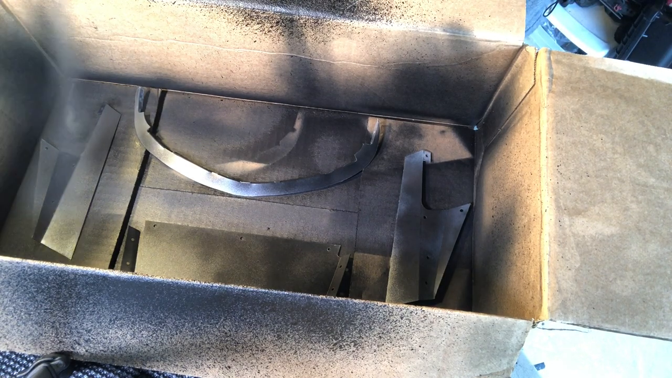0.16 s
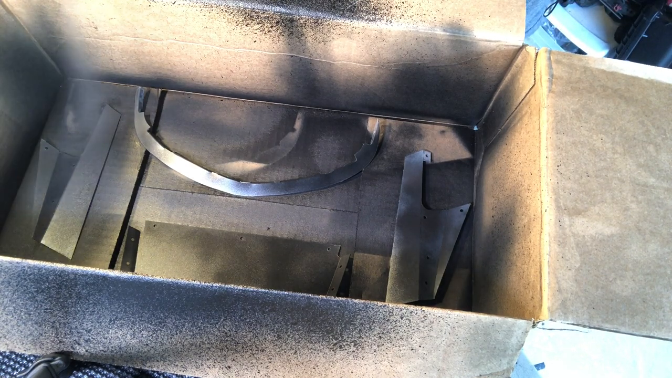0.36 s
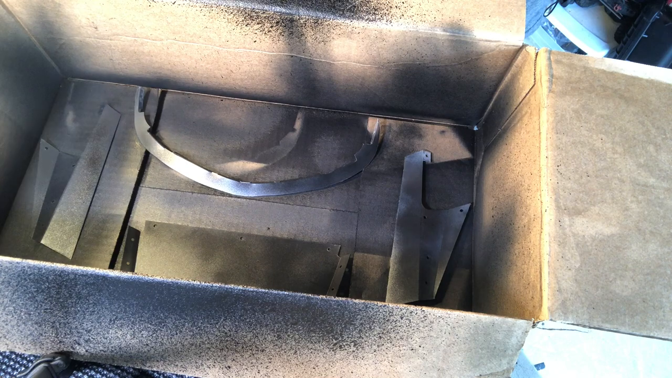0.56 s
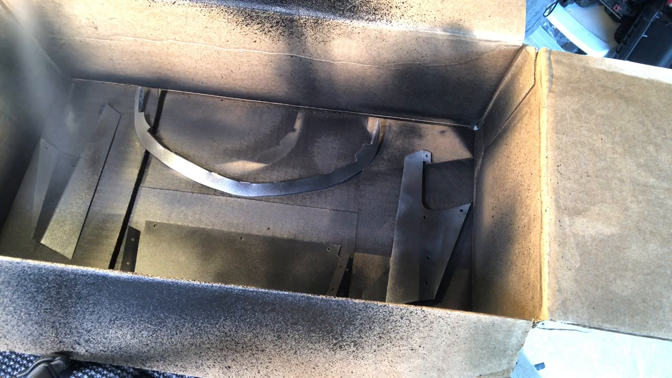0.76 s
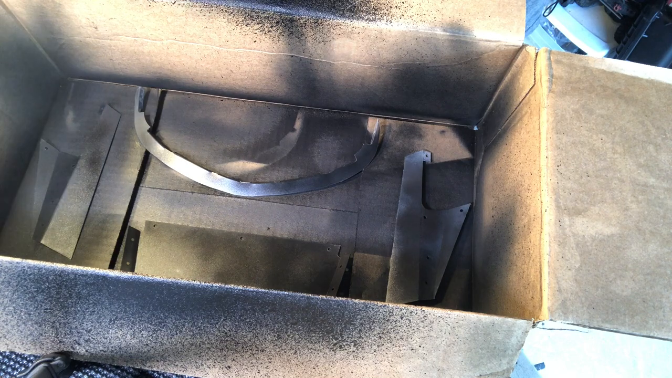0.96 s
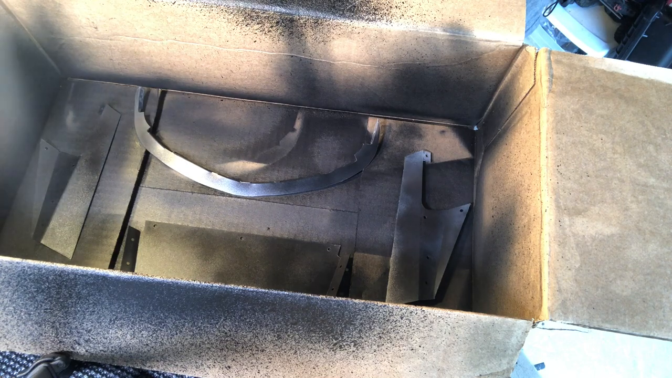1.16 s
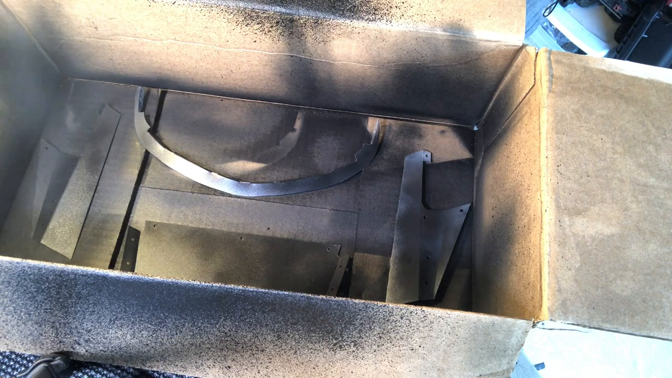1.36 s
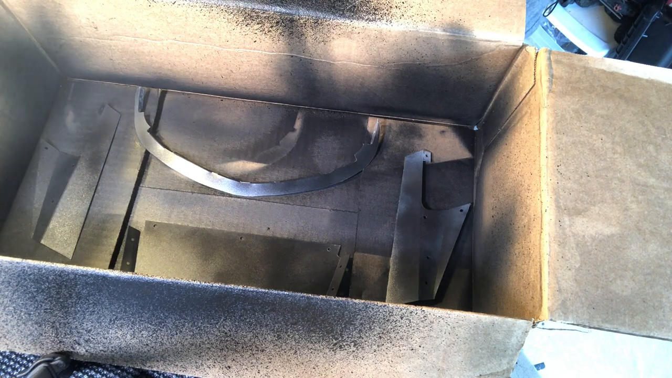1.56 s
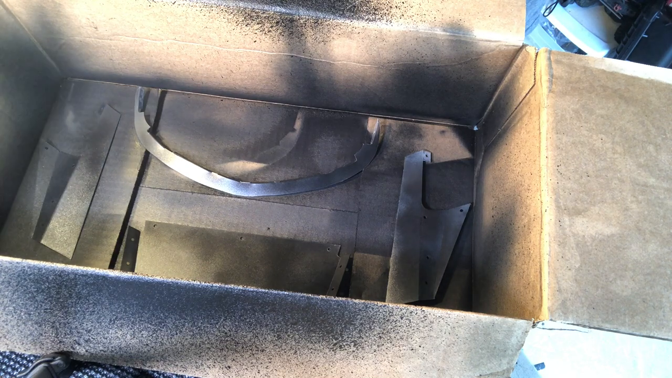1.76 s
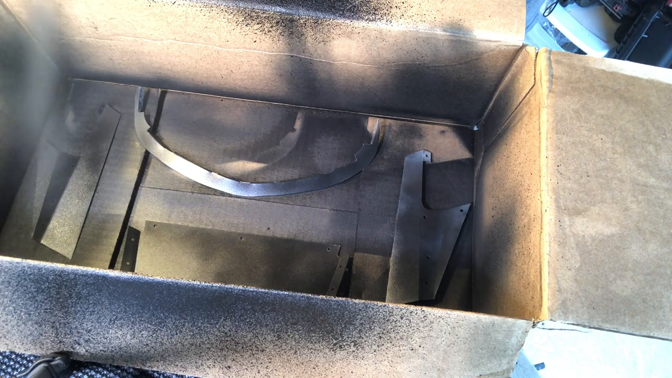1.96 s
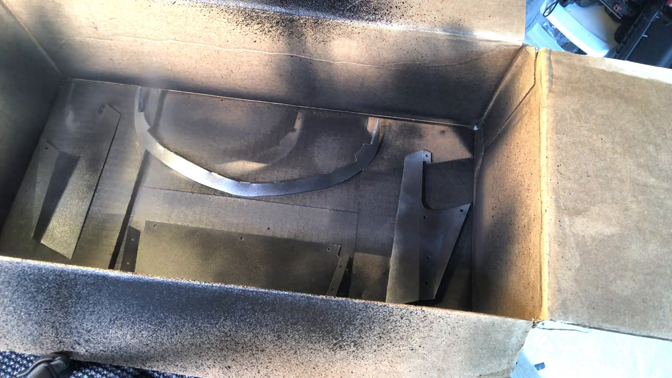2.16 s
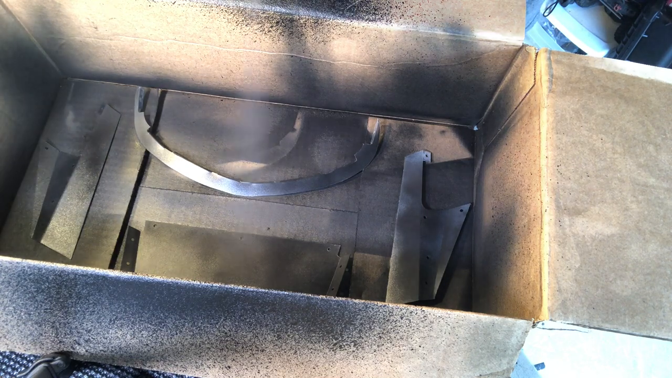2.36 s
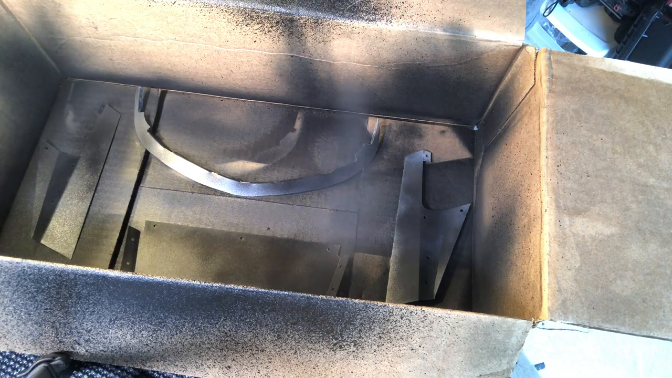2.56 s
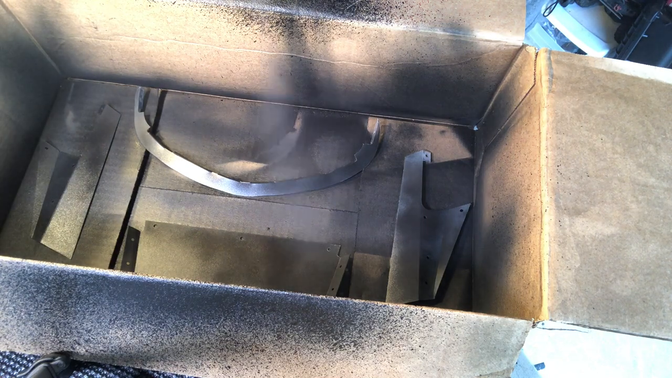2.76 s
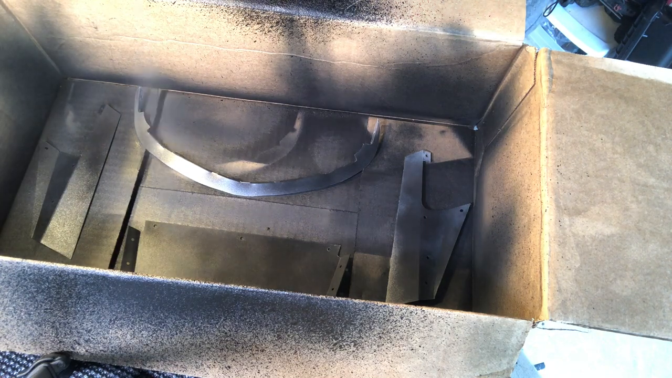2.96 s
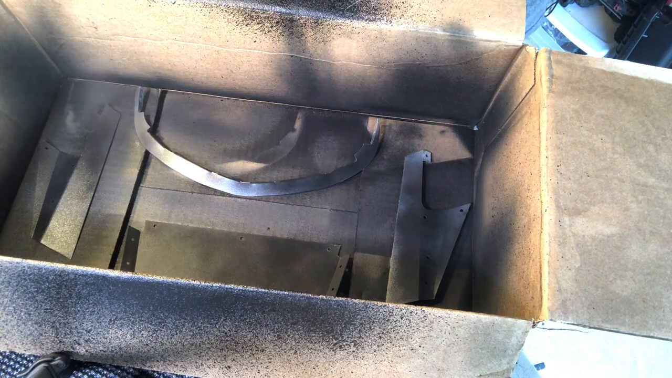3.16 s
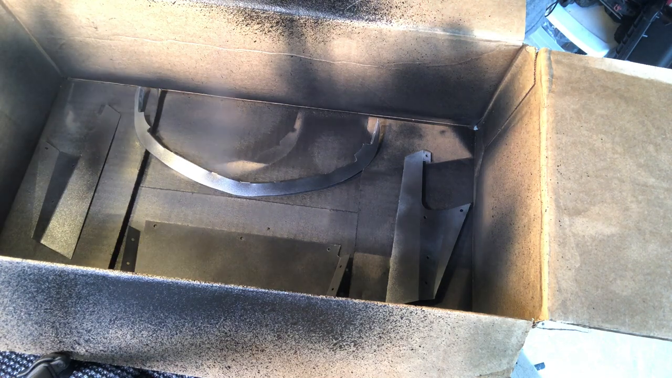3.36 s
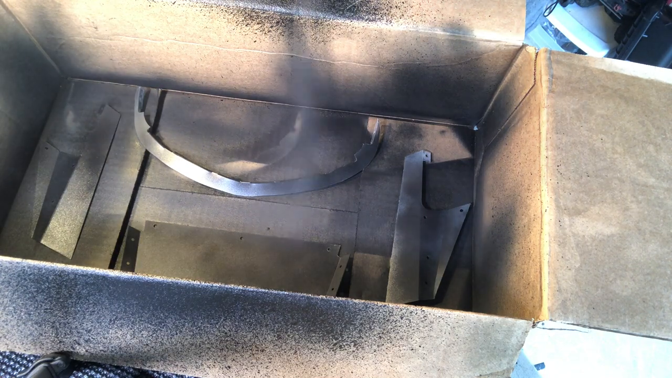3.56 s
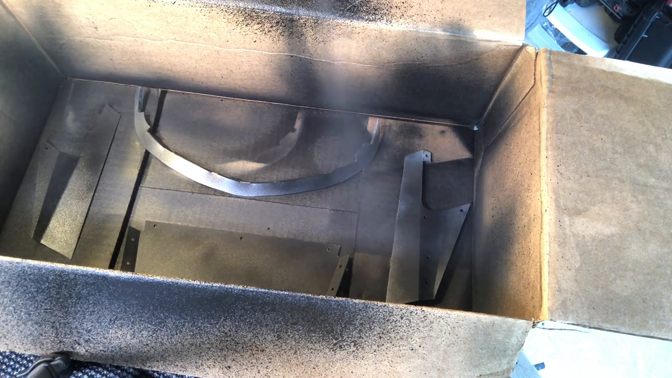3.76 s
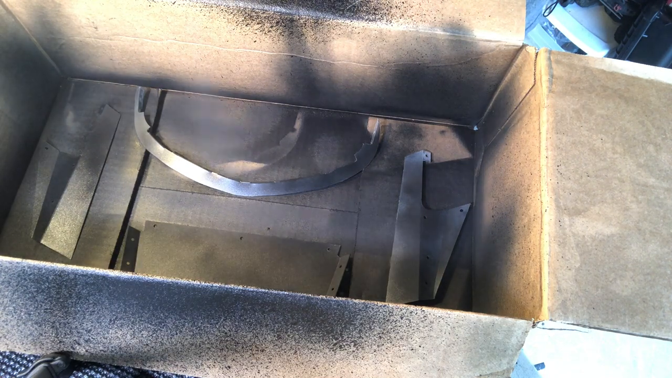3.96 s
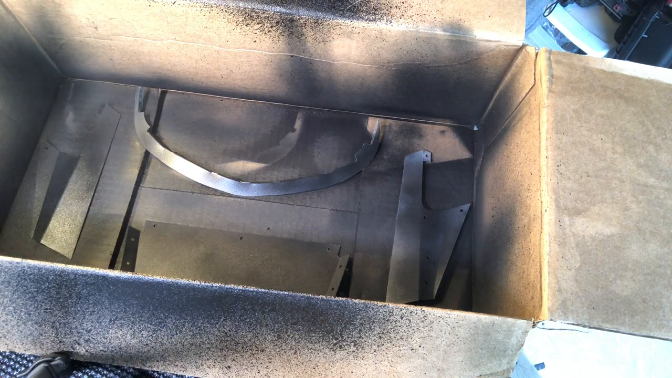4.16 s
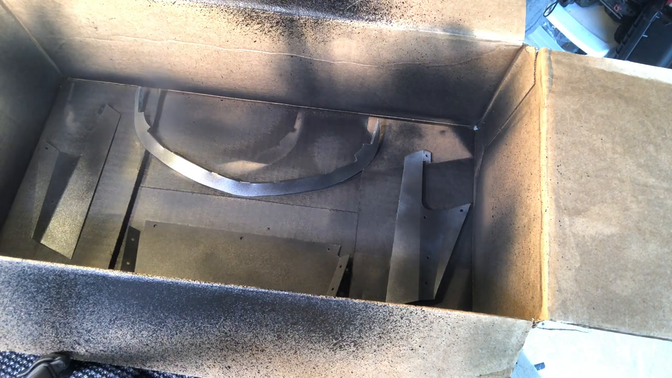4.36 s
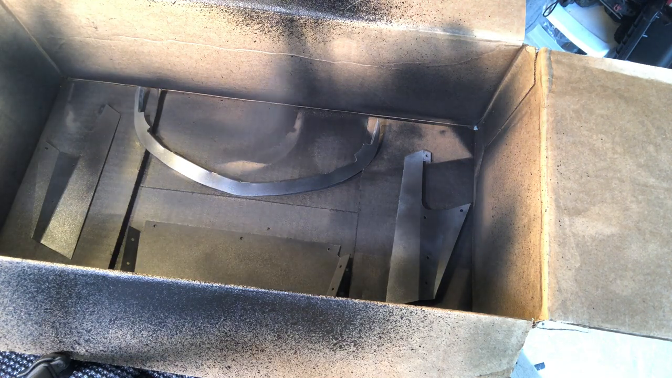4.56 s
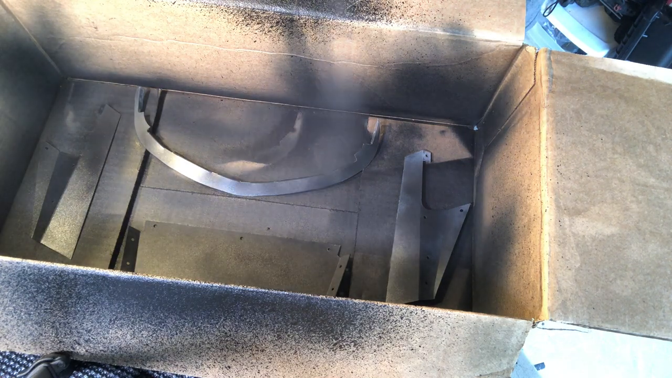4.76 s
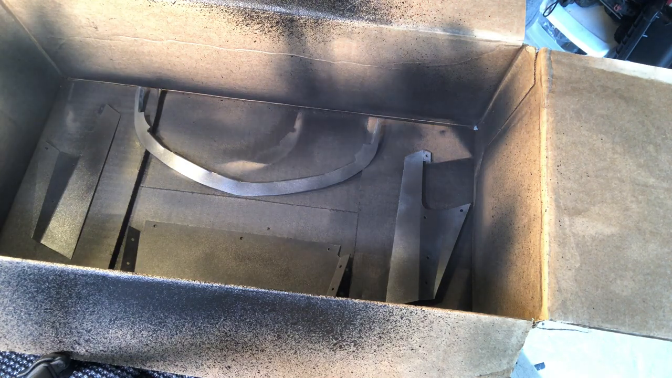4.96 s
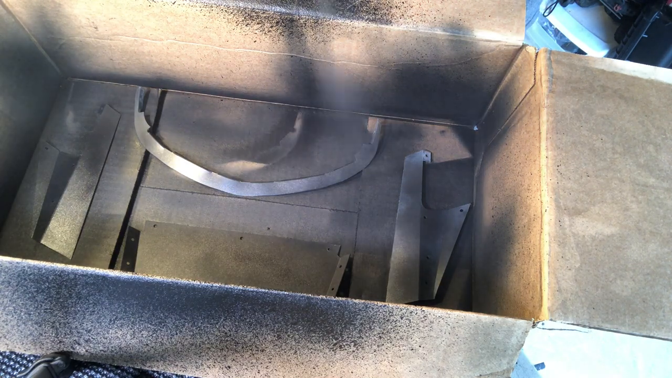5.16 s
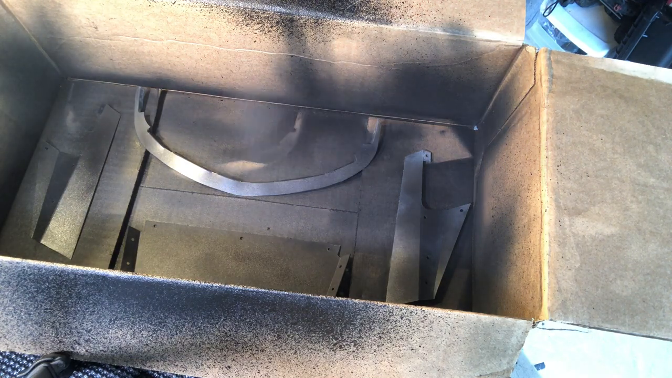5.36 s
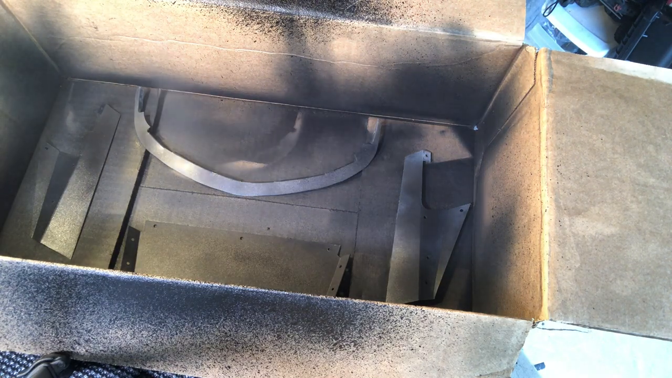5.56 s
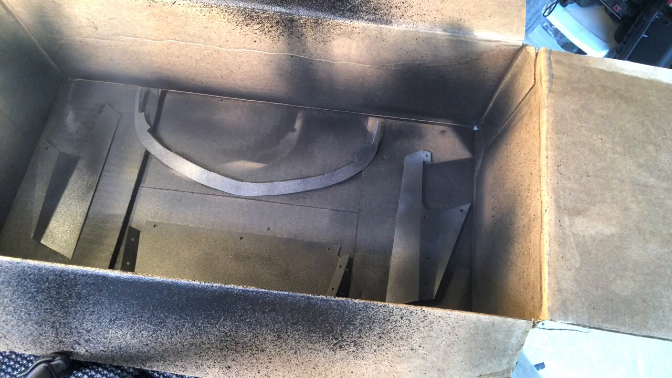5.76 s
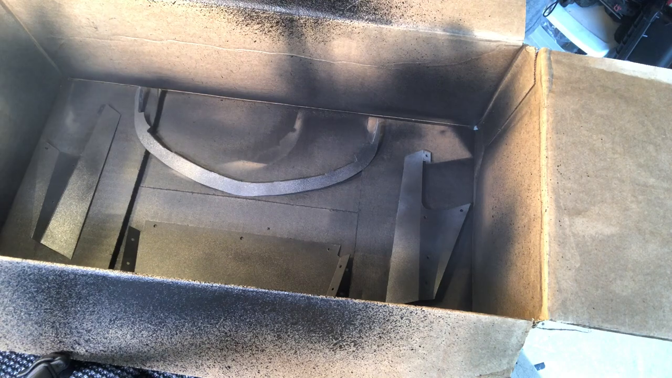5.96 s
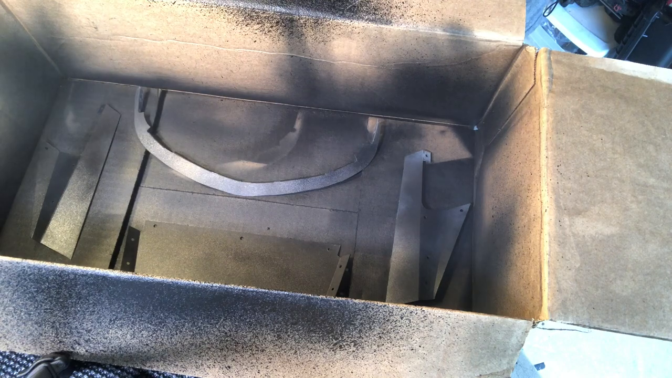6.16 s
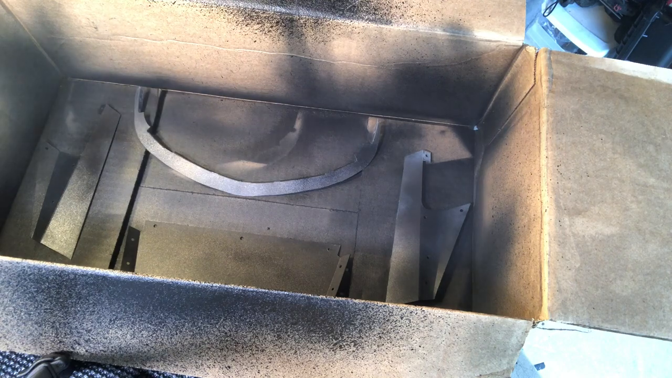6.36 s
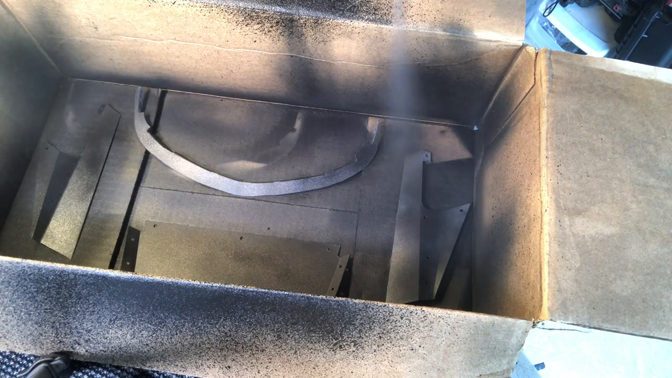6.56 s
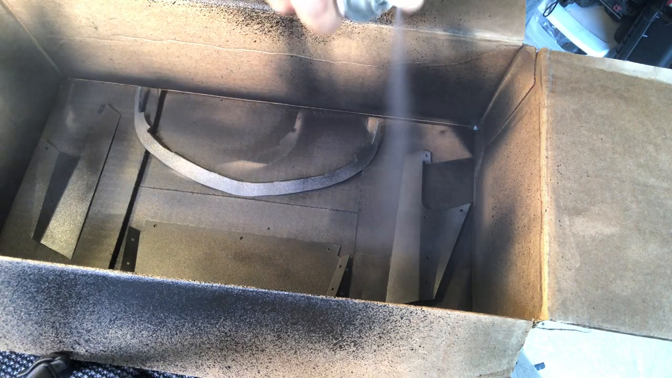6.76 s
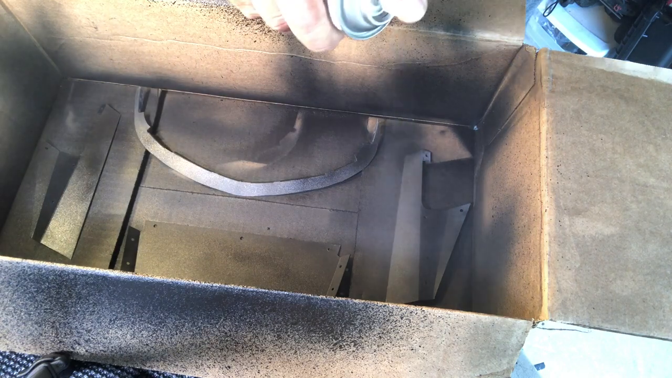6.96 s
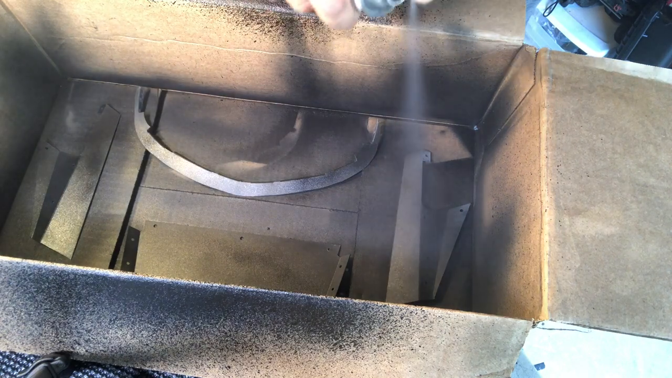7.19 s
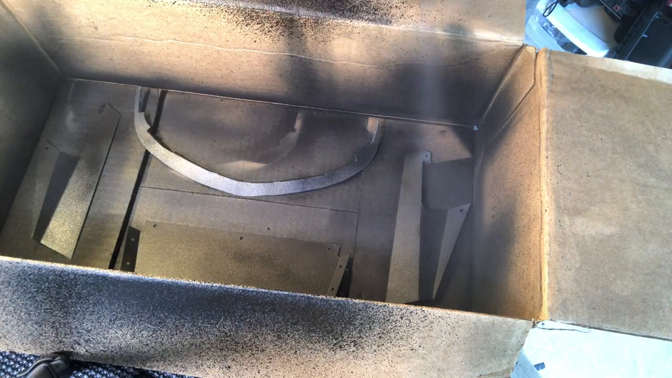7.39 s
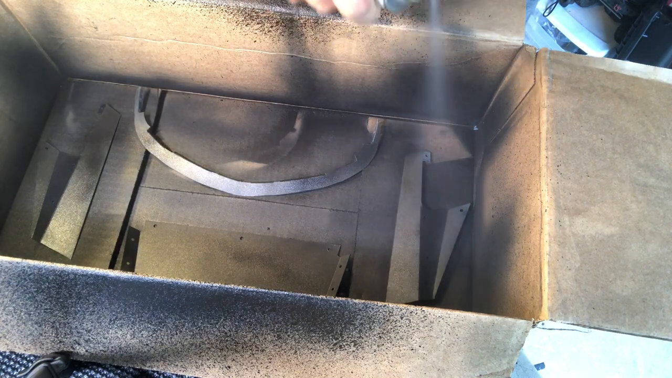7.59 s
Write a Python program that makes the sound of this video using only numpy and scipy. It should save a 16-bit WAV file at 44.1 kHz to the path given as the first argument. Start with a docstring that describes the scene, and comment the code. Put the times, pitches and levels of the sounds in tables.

```python
"""A spray can is already hissing at the start: the first of eleven bursts of paint onto parts in a cardboard box.
Each burst is shaped noise, gas hiss above and paint spatter below, with a spit and a wet gush as the valve
opens and a dribble as it shuts. Delayed copies off the box wall make the hiss swish as the hand strokes.
Besides the bursts there are small nozzle ticks (noise snaps), a low hum (drifting sines in a soft rumble)
and birds far away (sliding whistles)."""
import sys
import numpy as np
from scipy import signal
from scipy.fft import rfft, irfft, next_fast_len
from scipy.io import wavfile
from scipy.ndimage import uniform_filter1d, map_coordinates

SR = 44100
rng = np.random.default_rng(int(sys.argv[2]) if len(sys.argv) > 2 else 0)


def wrap_up_sound(samples):
    """Save the sound to the file named by the first command line argument, as 16-bit audio."""
    columns = np.atleast_2d(samples).T
    # keep every value between -1 and 1, then stretch to whole-number steps
    tamed = np.clip(columns, -1, 1)
    steps = np.round(tamed * 32767).astype(np.int16)
    wavfile.write(sys.argv[1], SR, steps)


N = 336483
TIME = np.arange(N) / SR  # seconds
# filters work on a padded length, so that their tails do not wrap round
SIZE = next_fast_len(N + SR // 2, True)
HZ = np.fft.rfftfreq(SIZE, 1 / SR)


def amp(db):
    """Turns decibels into gain."""
    return 10 ** (np.asarray(db) / 20)


def unit(x):
    """Scales a sound to rms 1."""
    return x / np.sqrt(np.mean(x ** 2) + 1e-20)


def read(points, hz):
    """Reads a table of frequencies on a logarithmic frequency axis."""
    table_hz, value = np.transpose(points)
    return np.interp(np.log(hz + 1), np.log(table_hz), value)


def curve(rows, column=1):
    """Reads one column of a time table at every sample."""
    rows = np.array(rows)
    return np.interp(TIME, rows[:, 0], rows[:, column])


def shape(x, gain):
    """Filters a sound by a gain given at each frequency of HZ."""
    return irfft(rfft(x, SIZE) * gain, SIZE)[:N]


def noise(gain):
    """Makes noise of rms 1 with the given spectrum."""
    return unit(shape(rng.standard_normal(N), gain))


def wobble(rate_hz):
    """Random ups and downs of rms 1, from 6 Hz up to about the given rate."""
    return noise(1 / (1 + (HZ / rate_hz) ** 2) * (HZ > 6))


def bell(centre_hz, width_hz):
    """A resonance curve of height 1 over HZ."""
    return 1 / (1 + (2 * (HZ - centre_hz) / width_hz) ** 2)


def puff(start, decay, attack=0.00079):
    """An envelope that jumps up and dies away; all times in seconds."""
    age = np.maximum(TIME - start, 0)
    return np.minimum(age / attack, 1) * np.exp(-np.minimum(age / decay, 50))


def reverb(x, t60, delay):
    """Sparse random reflections after a delay (s), each band dying at its own speed; energy 1."""
    is_reflection = (rng.random(SR) < .1) * (np.arange(SR) > delay * SR)
    taps = rng.standard_normal(SR) * is_reflection
    hz, t, z = signal.stft(taps, SR, nperseg=256)
    fade_db = -60 * t / read(t60, hz)[:, None]
    tail = signal.istft(z * amp(fade_db), SR, nperseg=256)[1]
    return signal.fftconvolve(x, tail / np.linalg.norm(tail))[:N]


# Colour of the rumble around the scene. Each row: frequency in Hz, relative level in dB per Hz.
RUMBLE_COLOUR = [(15, -54), (25, -2.5), (107, 1.5), (267, -7.5), (433, -8.5), (567, -3.5), (703, -10.5),
                 (1110, -11.5), (1800, -15.5), (2120, -21.5), (2420, -16), (3170, -24.5), (3930, -23.5),
                 (13500, -32.5), (15500, -35)]
# Lines of the low hum. Each row: frequency in Hz, width in Hz, level in dB before the low cut.
HUM_LINES = [(62.9, 12.7, -71.5), (119.7, 3.25, -71), (262.6, 22.2, -73.5)]


def ambience(rumble_db=-64, low_cut_hz=48):
    """Soft rumble with a hum in it; the drifting phase of each hum line gives it its width."""
    hum = 0
    for hz, width_hz, db in HUM_LINES:
        drift = np.cumsum(rng.standard_normal(N)) * np.sqrt(2 * np.pi * width_hz / SR)
        hum = hum + amp(db) * unit(np.sin(2 * np.pi * hz * TIME + drift))
    rumble_cut = HZ ** 3 / (HZ ** 3 + low_cut_hz ** 3)
    hum_cut = HZ ** 4 / (HZ ** 4 + low_cut_hz ** 4)
    rumble = noise(amp(read(RUMBLE_COLOUR, HZ)) * rumble_cut)
    return amp(rumble_db) * rumble + shape(hum, hum_cut)


def phrases(calls, notes):
    """Lays out a bird's notes at each of its calls."""
    return [(s + delay, length, first_hz, last_hz, call_db + db, bend)
            for s, call_db in calls for delay, length, first_hz, last_hz, db, bend in notes]


# Two birds each repeat one call, a low slur and then a high one. Each row: delay in seconds, length in
# seconds, first Hz, last Hz, level in dB against the call, bend (1 is straight, more levels off sooner).
SLOW_BIRD_SLURS = [(0, .07, 1717, 2237, -.5, 1.09), (.078, 0.0607, 2910, 3430, -.5, 3.4)]
QUICK_BIRD_SLURS = [(0, 0.0484, 1940, 2260, -3.5, 1.36), (.034, .06, 2100, 3220, 3, 4.8)]
# When those birds call. Each row: start in seconds, level in dB before the direct and scattered shares.
SLOW_BIRD_TIMES = [(.451, -56.5), (.879, -58), (1.311, -61), (1.53, -62)]
QUICK_BIRD_TIMES = [(4.955, -70), (5.937, -63), (6.078, -62.5), (6.218, -60), (6.359, -62)]
# Nearly level whistles of a third bird. Each row: start in seconds, length in seconds, first Hz, last Hz,
# level in dB before the same shares, bend.
LEVEL_WHISTLES = [(3.076, 0.073, 1656, 1622, -59, 1), (6.071, 0.35, 1586, 1622, -64.5, 2.9)]
# How long the surroundings scatter the birdsong. Each row: frequency in Hz, time to fall 60 dB in seconds.
SCATTER_T60 = [(1500, 0.53), (3500, 0.49)]


def birds(direct_db=-4.0, scatter_db=-4.0, waver=0.019):
    """Whistles whose pitch slides, most of them up, trailed by their scatter from the surroundings."""
    song = np.zeros(N)
    drift = waver * wobble(260)  # fraction of the pitch
    notes = phrases(SLOW_BIRD_TIMES, SLOW_BIRD_SLURS) + phrases(QUICK_BIRD_TIMES, QUICK_BIRD_SLURS)
    for s, length, first_hz, last_hz, db, bend in notes + LEVEL_WHISTLES:
        at = np.arange(round(s * SR), round((s + length) * SR))
        hz = last_hz + (first_hz - last_hz) * np.linspace(1, 0, len(at)) ** bend
        whistle = np.sin(2 * np.pi * np.cumsum(hz * (1 + drift[at])) / SR)
        song[at] += amp(db) * unit(whistle * signal.windows.tukey(len(at), .3))
    scatter = reverb(song, SCATTER_T60, delay=0.0036)
    return amp(direct_db) * song + amp(scatter_db) * scatter


# Ticks of the nozzle. Each row: start in seconds, level in dB.
NOZZLE_TICKS = [(0.572, -47.5), (1.423, -42.5), (1.721, -52.5), (1.812, -51.5), (6.209, -64)]
# Colour of those ticks. Each row: frequency in Hz, relative level in dB per Hz.
TICK_SPECTRUM = [(500, -9), (1300, 1), (2200, 6.5), (3000, 2), (4000, -7), (5200, 4), (6800, -3),
                 (8200, -1), (10000, -7), (13000, -8), (16000, -26)]


def ticks(decay=0.0024, rattle=0.23, rattle_decay=0.019):
    """Short dry snaps of the plastic nozzle, each with a brief, weaker rattle; decays in seconds."""
    snaps = 0
    for s, db in NOZZLE_TICKS:
        snaps = snaps + amp(db) * (puff(s, decay, attack=0.0004) + rattle * puff(s, rattle_decay))
    return noise(amp(read(TICK_SPECTRUM, HZ))) * snaps


# Turning points of the hand's strokes. Each row: time in seconds, lag in ms of the echo off the box wall.
HAND_TURNS = [(-.15, 1.37), (.43, 1.19), (1, 1.34), (1.35, 1.23), (2.6, 1.59), (3.12, 1.38), (3.67, 1.56),
              (4.08, 1.44), (5.1, 1.49), (5.92, 1.35), (6.95, 1.63), (7.5, 1.41)]


def stroke_lag():
    """Lag of the wall echo in ms: the hand slows into each turning point and speeds up between them."""
    times, lag_ms = np.transpose(HAND_TURNS)
    turns = np.arange(len(times))
    stroke = np.interp(TIME, times, turns)
    eased = stroke - .6 * np.sin(2 * np.pi * stroke) / (2 * np.pi)
    return np.interp(eased, turns, lag_ms)


# How well the box wall reflects. Each row: frequency in Hz, strength of the echo from 0 to 1.
WALL_STRENGTH = [(500, 0), (2000, 0.17), (4000, 0.18), (6200, 0), (7800, 0.61), (8900, 0.12), (10200, 0.48),
                 (12000, 0.45), (14300, 0.92), (16000, 0.2)]


def wall_echo(x):
    """The echo's lag follows the can, so a comb of peaks slides through the hiss."""
    lag = stroke_lag() * SR / 1000  # samples
    return map_coordinates(shape(x, read(WALL_STRENGTH, HZ)), [np.arange(N) - lag], order=5)


def box_echoes(x, count=12, longest_ms=5):
    """Weaker echoes off flaps and metal parts: each path grows or shrinks at its own rate as the can moves."""
    fine = signal.resample_poly(x, 4, 1)  # four times finer, for smooth moving delays
    fine_time = np.arange(4 * N) / (4 * SR)
    sweep = stroke_lag() - np.mean(stroke_lag())
    out = 0
    for k, (place, slope) in enumerate(rng.random((count, 2))):
        direction = (-1) ** k
        sign = (-1) ** (k // 2)
        lag_ms = .5 + longest_ms * (k + place) / count + direction * (.5 + slope) * sweep
        out = out + sign * np.interp(TIME - lag_ms / 1000, fine_time, fine)
    return out / np.sqrt(count)


# Resonances that colour the spray, from the box low down and the nozzle higher up.
# Each row: frequency in Hz, width in Hz, lift in dB.
RESONANCES = [(284, 110, 6.5), (615, 32, 13.5), (850, 41, -2), (1059, 45, 4.5), (1193, 19, 7),
              (4720, 360, 0.5), (8230, 190, 3), (12900, 350, 0.5)]


def box_db():
    """The lift in dB that the box and nozzle resonances give each frequency."""
    return sum(db * bell(hz, width) for hz, width, db in RESONANCES)


# The presses of the nozzle. Each row: opens in seconds, shuts in seconds, opening time in seconds, closing
# time in seconds, then relative levels in dB of the first spit, wet gush, gas hiss and paint spatter,
# and the level in dB of the last dribble.
NOZZLE_PRESSES = [(-.05, 0.447, .02, 0.042, -15, -14, -36, -48, -52),
                  (0.614, 0.889, 0.016, 0.031, -1, -4, -37, -47.5, -54),
                  (1.008, 1.381, 0.018, .029, -5.5, -1, -37, -46.5, -50),
                  (1.926, 2.582, 0.013, 0.042, 0, -14, -37, -46, -49),
                  (2.658, 3.115, 0.0162, 0.033, -2, -0.5, -36, -46, -49),
                  (3.153, 4.179, 0.018, 0.047, -6, -4, -36.5, -46.5, -50),
                  (4.289, 4.974, .015, 0.05, -3, -9, -37, -48, -48),
                  (5.082, 5.93, 0.022, 0.02, 0, -11, -37, -47.5, -51),
                  (6.424, 6.977, 0.015, 0.045, -.5, -5, -36.5, -47.5, -50.5),
                  (7.045, 7.46, 0.023, 0.065, -4, -11, -37.5, -46, -55.5),
                  (7.548, 7.694, 0.0148, .04, -2.5, -3.5, -39, -46.5, -55)]
# paint left in the nozzle dribbles out just after the valve shuts
DRIBBLE_LAG_S, DRIBBLE_DECAY_S = 0.004, .012


def valve(spit_decay=0.0042, spit_attack=0.0013, gush_decay=0.018):
    """Valve opening, first spit, gush of paint that had gathered in the nozzle, and dribble as it shuts."""
    opening, spit, gush, drops = np.zeros((4, N))
    for opens, shuts, rise, fall, spit_db, gush_db, _, _, dribble_db in NOZZLE_PRESSES:
        rising = np.clip((TIME - opens) / rise, 0, 1) ** 2.6
        falling = np.clip((shuts - TIME) / fall, 0, 1) ** 0.77
        lift = rising * falling
        opening += lift
        spit += amp(spit_db) * puff(opens, spit_decay, attack=spit_attack)
        gush += amp(gush_db) * lift * puff(opens + 1.14 * rise, gush_decay, attack=0.0013)
        drops += amp(dribble_db) * puff(shuts + DRIBBLE_LAG_S, DRIBBLE_DECAY_S, attack=0.0024)
    return opening, spit, gush, drops


# each burst starts wet, with more spatter and less gas hiss; this extra fades with the time constant CLEAR_S
CLEAR_S, WET_HISS_DB, WET_SPATTER_DB = 0.025, -3.5, 1.8


def flow():
    """Relative levels in dB of gas hiss and paint spatter: each press holds its own, after a wet start."""
    rows = np.array(NOZZLE_PRESSES)
    press = np.maximum(np.searchsorted(rows[:, 0], TIME, side="right") - 1, 0)
    opens, *_, hiss_db, spatter_db, _ = rows[press].T
    wet = np.exp(-np.maximum(TIME - opens, 0) / CLEAR_S)
    return hiss_db + WET_HISS_DB * wet, spatter_db + WET_SPATTER_DB * wet


# Spectra of the jet aimed at the left, the middle and the right of the box, before the resonances.
# Each row: frequency in Hz, relative level in dB per Hz.
LEFT_SPECTRUM = [(530, -57), (900, -29.5), (1170, -20), (1270, -15), (1660, -19.5), (2460, -14.5),
                 (2870, -17), (3830, -10.5), (4420, -9.5), (6400, -14.5), (7840, -11), (9160, -12.5),
                 (11100, -8), (13300, 0), (15700, -10.5)]
MIDDLE_SPECTRUM = [(530, -38), (900, -21.5), (1210, -12.5), (1490, -19), (1800, -12), (2180, -13.5),
                   (2870, -11.5), (3120, -13.5), (3400, -9.5), (6250, -12.5), (7660, -5), (9060, -9),
                   (11400, 0.5), (13300, 3.5), (15700, -5.5)]
RIGHT_SPECTRUM = [(530, -48), (900, -22.5), (1230, -12.5), (1580, -15.5), (1720, -14.5), (2260, -12.5),
                  (2550, -12), (3870, -9), (4580, -9), (5750, -16), (7390, -7.5), (8630, -8.5), (9500, -15),
                  (13000, 3.5), (15700, -2)]
# Where the jet points. Each row: time in seconds, aim (0 left, 1 middle, 2 right).
JET_AIM = [(1.4, 0), (1.9, 1), (6, 1), (6.4, 2)]


def jet_noise(part, lo, hi, grain_db):
    """Grainy turbulence in one part of the jet's spectrum; each aim's filter is levelled between lo and hi Hz."""
    drive = unit(rng.standard_normal(N) * amp(grain_db * wobble(900)))
    aim = curve(JET_AIM)
    low_cut = HZ / (HZ + 120) * np.interp(HZ, [300, 900], [.75, 1])
    colour = amp(box_db()) * part * low_cut
    in_band = (HZ > lo) * (HZ < hi)
    out = 0
    for k, spectrum in enumerate((LEFT_SPECTRUM, MIDDLE_SPECTRUM, RIGHT_SPECTRUM)):
        gain = amp(read(spectrum[1:], HZ)) * colour  # the first row is left out
        share = np.maximum(1 - abs(aim - k), 0)
        out = out + share * shape(drive, gain / np.sqrt(np.mean(gain ** 2 * in_band)))
    return out


# Thick blobs that make the nozzle sputter. Each row: time in seconds (each starts 2 ms earlier), level in dB.
THICK_BLOBS = [(0.836, -47), (1.228, -49), (2.024, -55), (2.528, -47.5), (3.828, -49), (4.583, -50),
               (7.098, -46), (7.346, -48)]


def blobs(per_s=26, decay=0.0071, small_db=-59, spread_db=2):
    """Thick blobs of paint sputter through the nozzle, with smaller ones at random between them."""
    size_db = small_db + spread_db * np.minimum(rng.exponential(1, N), 2)
    starts = rng.random(N) < per_s / SR
    small = signal.lfilter([1], [1, -np.exp(-1 / (decay * SR))], amp(size_db) * starts)
    thick = sum(amp(db) * puff(s - .002, 1.5 * decay, attack=0.0011) for s, db in THICK_BLOBS)
    return small + thick


def meander(x, patchy_db=1.5):
    """The jet wanders over the parts, so narrow patches of its spectrum swell and fade."""
    z = signal.stft(x, nperseg=1024, noverlap=768)[2]
    patches = rng.standard_normal(z.shape)
    for _ in range(2):
        patches = uniform_filter1d(patches, size=4, axis=0)  # across frequency
        patches = uniform_filter1d(patches, size=22, axis=1)  # across time
    return signal.istft(z * amp(patchy_db * unit(patches)), nperseg=1024, noverlap=768)[1][:N]


# the hand sways the jet a few times a second; the highest hiss is beamed and swings most
SWAY_HZ, SWAY_HISS_DB, SWAY_SPATTER_DB, SWAY_BEAM_DB = 2.83, 1.4, 0.42, 2


def sway():
    """Slow random swing of rms 1, around the rate at which the hand sways; new at each call."""
    return noise(bell(SWAY_HZ, SWAY_HZ) ** 2)


# The highest hiss flares when the jet turns towards the listener. Each row: time in seconds, lift in dB.
HISS_FLARES = [(2.5, 10), (3.63, 9), (3.76, 5)]
FLARE_S = .042  # from the peak to 1/e of the lift
# Colour of wet paint, before the resonances. Each row: frequency in Hz, relative level in dB per Hz.
WET_PAINT = [(150, -11), (400, -4.5), (700, -3), (1300, 4.5), (2200, -3), (4000, -26), (8000, -33)]
HISS_BAND, SPATTER_BAND = (9000, 16000), (900, 5000)  # Hz


def spray(hiss_db=-2.08, spatter_db=-1, split_hz=6500, beam_hz=14300, flutter_db=0.12, sputter_db=1.0,
          gush_db=-45):
    """Gas hiss above, paint spatter below; both tremble with the uneven flow through the valve."""
    gas_db, paint_db = flow()
    opening, spit, gush, drops = valve()
    low = 1 / (1 + (HZ / split_hz) ** 8)

    hiss_level_db = hiss_db + gas_db + SWAY_HISS_DB * sway()
    hiss = jet_noise(np.sqrt(1 - low), *HISS_BAND, grain_db=1.0) * amp(hiss_level_db)
    flare_db = sum(db * np.exp(-((TIME - s) / FLARE_S) ** 2) for s, db in HISS_FLARES)
    beam_db = SWAY_BEAM_DB * sway() + flare_db
    highest = shape(hiss, (1 + np.tanh((HZ - beam_hz) / 600)) / 2)
    hiss = hiss + (amp(beam_db) - 1) * highest

    spatter_level_db = spatter_db + paint_db + SWAY_SPATTER_DB * sway() + sputter_db * wobble(32)
    spatter = jet_noise(np.sqrt(low), *SPATTER_BAND, grain_db=0.4) * amp(spatter_level_db)

    wet_noise = noise(amp(read(WET_PAINT, HZ) + box_db()))
    splash = wet_noise * (amp(gush_db) * gush + blobs() * opening)
    dribble = drops * noise(amp(box_db() + .5 * read(MIDDLE_SPECTRUM, HZ)) / (1 + HZ / 6000))
    jet = meander(hiss + spatter) * (opening + spit)
    return (jet + splash) * amp(flutter_db * wobble(40)) + dribble


# How long the room rings. Each row: frequency in Hz, time to fall 60 dB in seconds.
ROOM_T60 = [(300, 0.36), (3000, 0.67), (8000, 0.41), (15000, 0.26)]


def scene(flaps_db=-10, room_db=-19):
    """Can and nozzle at the box in a fairly dry room, with birds and hum; the same sound on both sides."""
    can = spray() + ticks()
    near = can + wall_echo(can) + amp(flaps_db) * box_echoes(can)
    room = amp(room_db) * reverb(can, ROOM_T60, delay=0.0053)
    mono = near + room + birds() + ambience()
    return np.array([mono, mono])


EDGE_HZ = 15950


def record(dry):
    """The recorder's band limit: a steep low-pass that removes what lies above EDGE_HZ."""
    low_pass = signal.firwin(1023, EDGE_HZ, window=("kaiser", 8), fs=SR)
    return signal.oaconvolve(dry, low_pass[None], "same")


dry = scene()
out = record(dry)
wrap_up_sound(out)
```